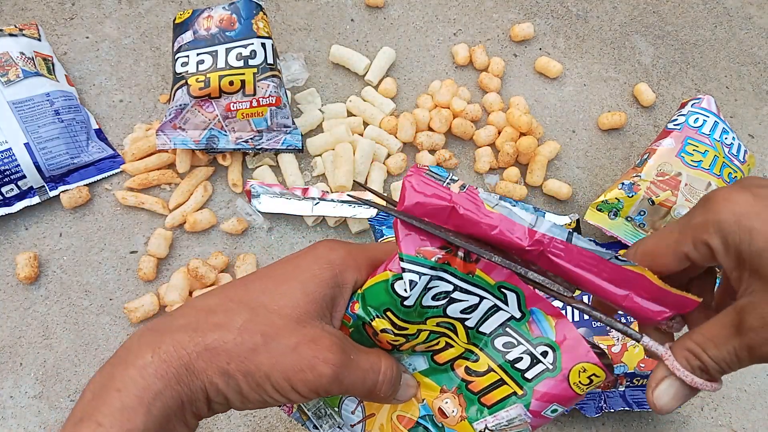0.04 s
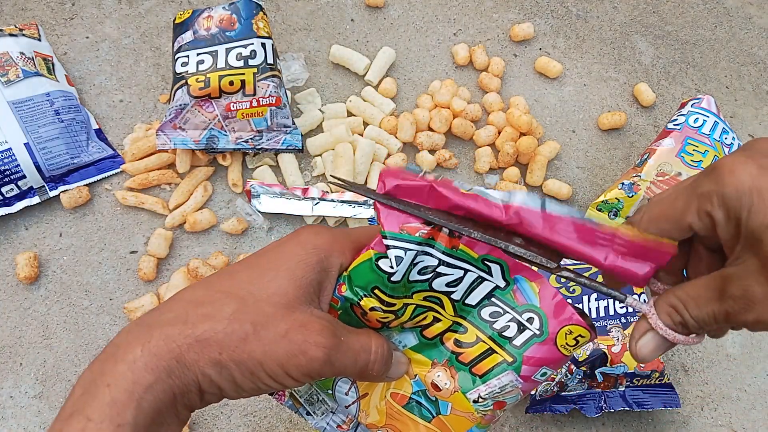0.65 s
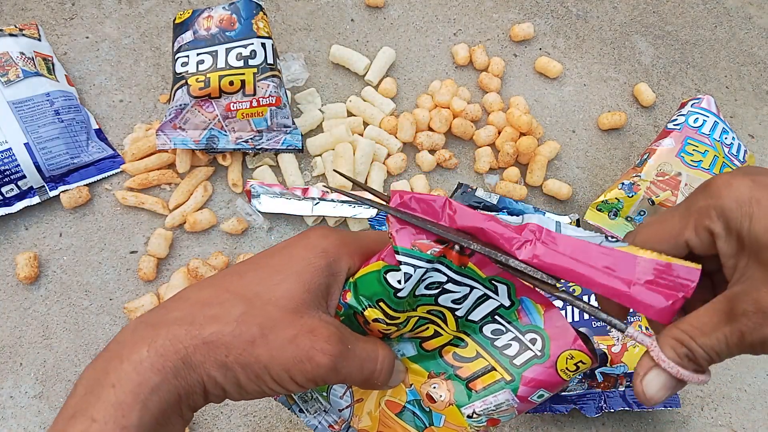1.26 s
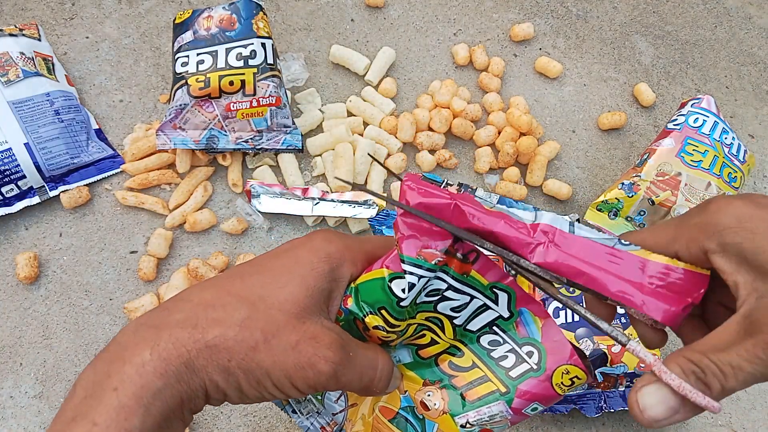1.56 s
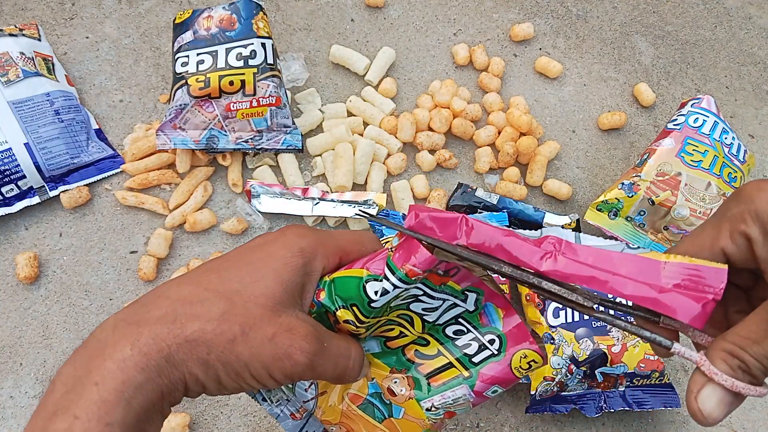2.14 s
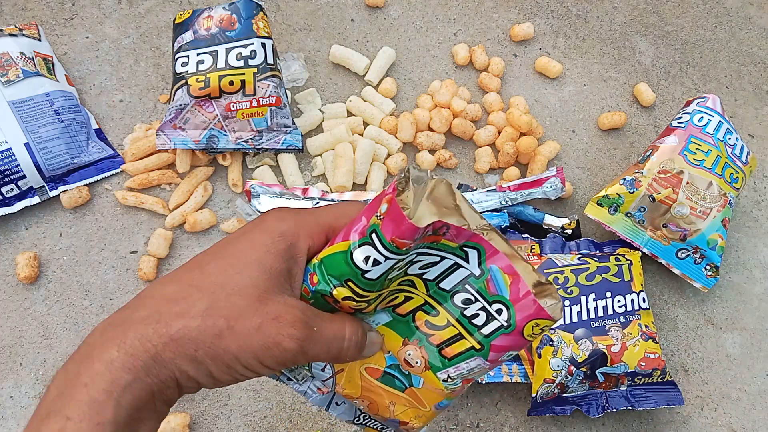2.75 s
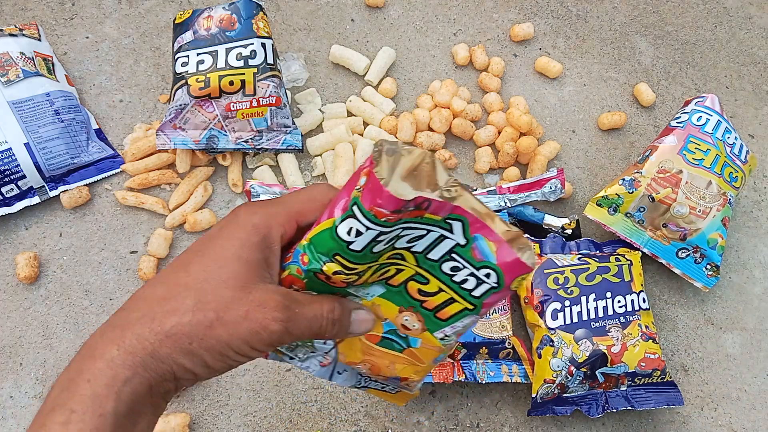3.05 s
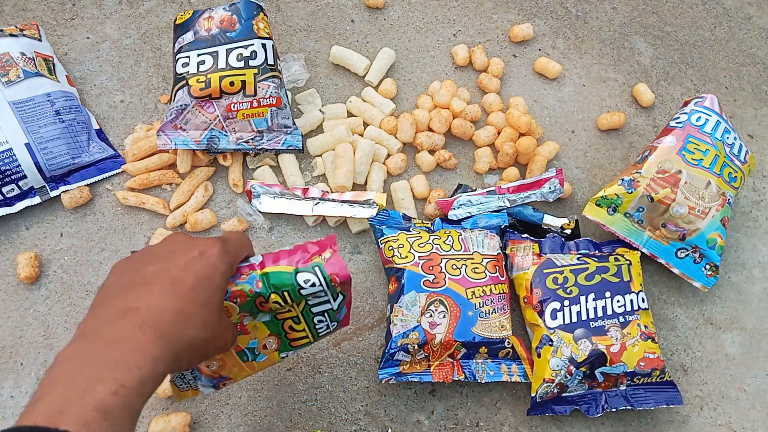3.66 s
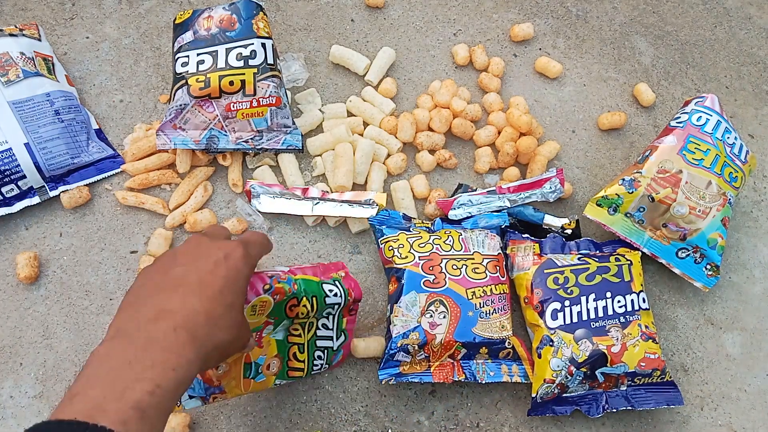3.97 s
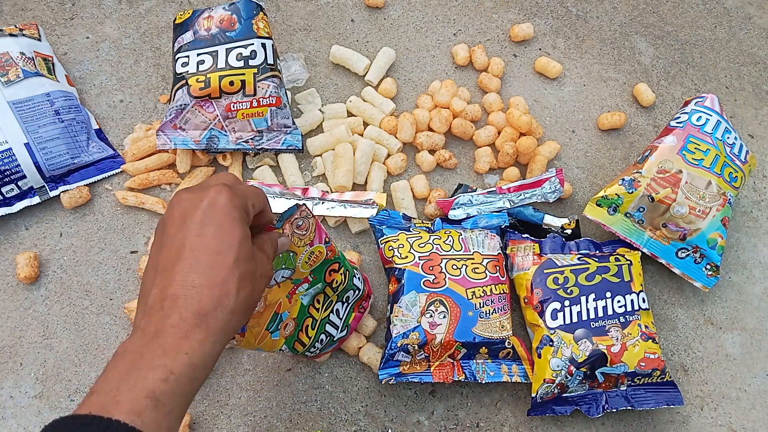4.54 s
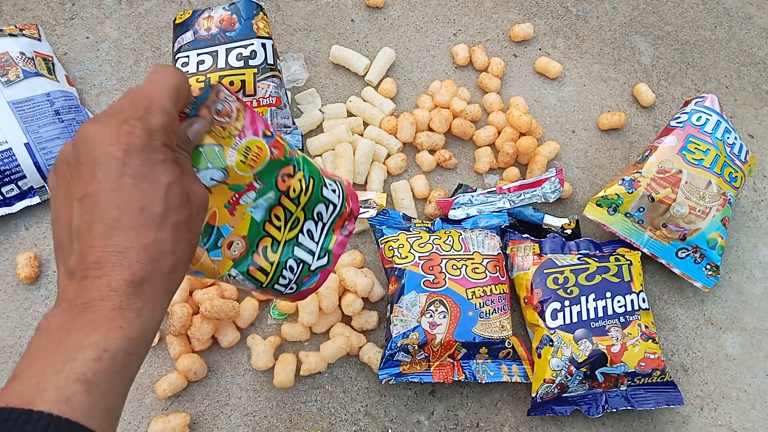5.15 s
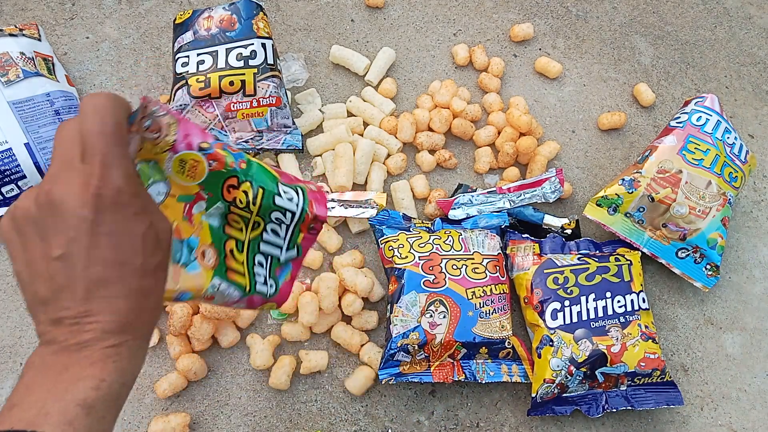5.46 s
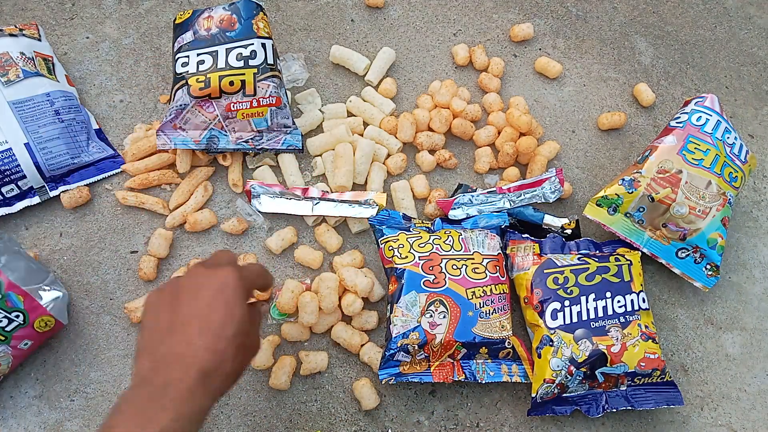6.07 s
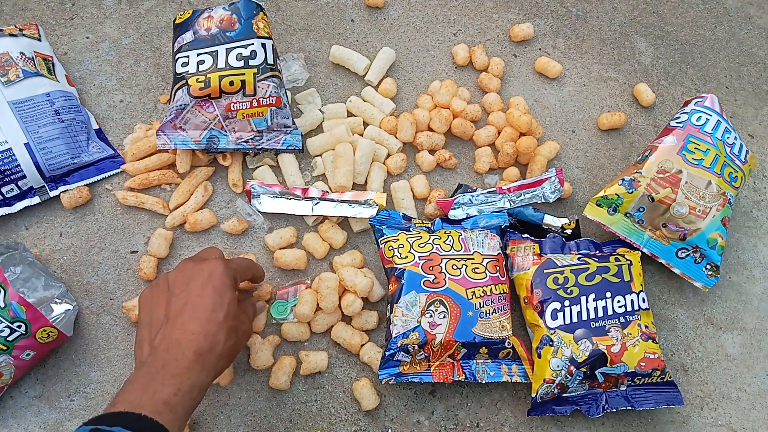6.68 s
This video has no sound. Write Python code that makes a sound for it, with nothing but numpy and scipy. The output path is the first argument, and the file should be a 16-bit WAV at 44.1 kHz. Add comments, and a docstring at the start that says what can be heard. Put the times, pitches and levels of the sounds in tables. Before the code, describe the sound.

Close, sharp crinkling of a snack packet being snipped open and emptied, with puffs lightly tapping the ground outdoors.

```python
"""Close up and outdoors, over a faint rumble, scissors open a foil snack packet and it is emptied.
First the film snaps in the hand, a blade pings faintly, and short bites crumple their way through.
Near 3 s the packet lifts with a swish and crinkles as it tips; corn puffs slide out onto concrete.
From about 5 s it is shaken empty, the film buckling in sharp snaps and dense crumples.
Last, a palm spreads the heap with a soft scrape and the rumble eases off."""
import sys
import numpy as np
from scipy import signal
from scipy.io import wavfile
from scipy.ndimage import uniform_filter1d

SR = 44100
rng = np.random.default_rng(int(sys.argv[2]) if len(sys.argv) > 2 else 0)


def generate_wav(signal):
    """Clip the signal to [-1, 1] and save it as 16-bit WAV at the path in sys.argv[1]."""
    frames = np.transpose(np.atleast_2d(signal))
    scaled = np.clip(frames, -1, 1) * 32767
    pcm = np.round(scaled).astype(np.int16)
    wavfile.write(sys.argv[1], SR, pcm)


N = 300538

# scissor bites, squeezes and shakes: (start [s], end [s], crack level [dB], bag thump level [dB])
CRUMPLES = [(0.722, 0.777, -42, -64), (0.934, 1.013, -36, -48.5), (1.208, 1.305, -44, -58.5),
            (1.37, 1.372, -55, -48.5), (1.566, 1.652, -43.5, -45.5), (1.904, 2.066, -39.5, -58),
            (2.084, 2.134, -51, -43.5), (2.364, 2.395, -39, -37.5), (2.652, 2.684, -40.5, -56),
            (2.74, 2.783, -46.5, -56.5), (4.772, 4.802, -37.5, -41.5), (5.079, 5.109, -45, -61),
            (5.314, 5.4, -45.5, -49), (5.427, 5.615, -35, -46), (5.614, 5.726, -37.5, -49.5),
            (5.818, 5.905, -39, -57.5), (5.955, 5.986, -51.5, -57)]
# tone of snapping film: (frequency [Hz], gain [dB])
SNAP_EQ = [(60, -25), (120, -6.5), (290, -2), (490, -3), (780, -1), (1300, 1), (2300, 0.5), (4100, 0),
           (5200, -5.5), (7400, -16), (9700, -8), (11900, -18.5), (15500, -19.5)]
# tone of softly rubbed film: (frequency [Hz], gain [dB])
RUB_EQ = [(60, -32), (130, 3), (340, -1.5), (520, -4.5), (950, -2.5), (1300, -4), (2500, -1.5), (4100, -3),
          (5200, -10.5), (7400, -19.5), (9700, -11), (12400, -23.5), (15500, -25)]
# registers of the packet: (low [Hz], high [Hz])
THUMP, BODY, CRACK, FIZZ = (100, 400), (400, 1500), (1500, 6000), (6000, 18000)
LEAD_SAMPLES, ATTACK_SAMPLES = 100, 200  # a click's run-up to its step, and its attack


def amp(db):
    """Decibels to gain."""
    return 10 ** (np.asarray(db) / 20)


def rms(x):
    """Root mean square."""
    return np.sqrt(np.mean(x ** 2) + 1e-20)


def add(mix, start_s, sound):
    """Mixes a sound in at a time."""
    part = mix[max(round(start_s * SR), 0):][:len(sound)]
    part += sound[:len(part)]


def colour(x, eq, size=4096):
    """Minimum-phase EQ, so attacks stay sharp."""
    hz, db = np.transpose(eq)
    bin_hz = abs(np.fft.fftfreq(size, 1 / SR)) + 1
    log_gain = np.log(amp(np.interp(np.log(bin_hz), np.log(hz), db)))
    taps = np.fft.ifft(np.exp(np.conj(signal.hilbert(log_gain)))).real[:size // 2]
    return signal.oaconvolve(x, taps.reshape((1,) * (x.ndim - 1) + (-1,)), axes=-1)[..., :x.shape[-1]]


def band(x, edges):
    """One register of a sound, with no phase shift."""
    return signal.sosfiltfilt(signal.butter(2, edges, "band", fs=SR, output="sos"), x, padtype=None)


def steadied(x, size=4400):
    """Evens out the slow level and leaves the grain."""
    return x / np.sqrt(abs(uniform_filter1d(x ** 2, size)) + 1e-12)


def placed(times, levels, shapes):
    """Puts each click at its time, with its attack at its level."""
    out = np.zeros(N)
    for when, db, shape in zip(times, levels, shapes):
        attack = shape[LEAD_SAMPLES:][:ATTACK_SAMPLES]
        add(out, when - LEAD_SAMPLES / SR, amp(db) * shape / rms(attack))
    return out


def clicks(ring_hz, ring, ring_s, flutter, decay_s, yield_s=0.0004, size=1300):
    """One click per pitch: the surface starts to yield, steps suddenly, then rings and flutters."""
    t = (np.arange(size) - LEAD_SAMPLES) / SR
    noise = rng.standard_normal((len(ring_hz), size))
    mode = np.sin(2 * np.pi * ring_hz[:, None] * t) * np.exp(-abs(t) / ring_s) * (t > 0)
    shiver = noise * np.exp(-abs(t) / np.where(t < 0, yield_s, decay_s))
    mode, shiver = (v / np.linalg.norm(v, axis=1, keepdims=True) for v in (mode, shiver))
    polarity = np.sign(noise[:, -1:])
    return ((t == 0) + ring * mode + flutter * shiver) * polarity


def crackle(per_s, spread_db, low_hz, high_hz, decay_s, fizz_spread_db=5, count=28):
    """Small facets give way at random, a few much louder than the rest, some dull and some bright."""
    strength = amp(spread_db * np.minimum(rng.exponential(1, N), 3))
    hits = strength * (rng.random(N) < per_s / SR)
    facet = rng.integers(0, count, N)
    ring_hz = np.geomspace(low_hz, high_hz, count)
    shapes = clicks(ring_hz, ring=0.63, ring_s=0.0036, flutter=1.92, decay_s=decay_s)
    fizz_gain = amp(fizz_spread_db * rng.uniform(0.037, 1, (count, 1)))
    shapes = shapes + (fizz_gain - 1) * band(shapes, FIZZ)
    out = sum(signal.oaconvolve(hits * (facet == k), shape)[:N] for k, shape in enumerate(shapes))
    return out / rms(out)


def outdoor_air(level_db=-61.5, lull_s=6.48, lull_db_per_s=19):
    """A faint bed of outdoor rumble that eases off at the end."""
    # tone of the air: (frequency [Hz], gain [dB])
    air_eq = [(25, -22), (85, 2.5), (140, -3), (700, -12.5), (3500, -30), (7000, -42)]
    rumble = colour(rng.standard_normal(N), air_eq)
    lull_db = lull_db_per_s * np.maximum(np.arange(N) / SR - lull_s, 0)
    return amp(level_db - lull_db) * rumble / rms(rumble)


def yard_echoes(x, ground_s=0.003, ground_db=-13, wall_s=0.0098, wall_db=-24, tail_db=-22, t60_s=0.24):
    """The ground and a wall echo each click; a weak, duller scattered tail follows."""
    t = np.arange(SR // 2) / SR
    scatter = signal.lfilter(*signal.butter(1, 5000, fs=SR), rng.standard_normal(len(t)))
    tail = scatter * np.exp(-np.log(1000) * t / t60_s) * (t > ground_s)
    echoes = amp(tail_db) * tail / np.linalg.norm(tail)
    add(echoes, ground_s, amp([ground_db]))
    add(echoes, wall_s, amp([wall_db]))
    return x + signal.oaconvolve(x, echoes)[:N]


def blade_pings(t60_s=0.29):
    """A steel blade rings faintly as the scissors shift."""
    # thin metal pings: (time [s], pitch [Hz], peak level [dB])
    pings = [(.375, 2100, -65), (.434, 2500, -64.5)]
    t = np.arange(SR // 2) / SR
    decay = np.exp(-np.log(1000) * t / t60_s)
    out = np.zeros(N)
    for when, hz, db in pings:
        add(out, when, amp(db) * decay * np.sin(2 * np.pi * hz * t))
    return out


def packet_swish(start_s=2.7, end_s=3.18, level_db=-55):
    """The lifted packet slides smoothly off its neighbours."""
    hiss = band(colour(rng.standard_normal(SR), SNAP_EQ), (BODY[0], FIZZ[1]))
    stroke = signal.windows.hann(int((end_s - start_s) * SR))
    out = np.zeros(N)
    add(out, start_s, amp(level_db) * stroke * hiss[:len(stroke)] / rms(hiss))
    return out


def heap_spreading():
    """Puffs roll and scrape softly under the palm."""
    # the stroke of the hand: (time [s], level [dB])
    stroke = [(6.1, -81), (6.22, -50), (6.33, -57), (6.47, -60.5), (6.62, -84)]
    # tone of the rubbed heap: (frequency [Hz], gain [dB])
    heap_eq = [(100, -13), (330, 4), (480, -3), (800, -10), (3000, -14), (3900, -11), (5200, -28.5),
               (15000, -34.5)]
    times, levels = np.transpose(stroke)
    rub = colour(rng.standard_normal(N), heap_eq)
    return np.interp(np.arange(N) / SR, times, amp(levels), left=0, right=0) * rub / rms(rub)


def film_motion(t, in_fizz=False, held_db=-68.5, creep_db=-9.5, settle_db_per_s=135):
    """Rustle envelope: film stirs while held, swells as the grip shifts, creeps back after a crumple."""
    # shifts of grip: (middle [s], length [s], relative level [dB], extra fizz [dB])
    grip_shifts = [(0.005, 0.12, -41.5, 3.5), (0.223, 0.23, -49.5, -2.5), (1.426, 0.09, -54, 7),
                   (1.89, 0.2, -46.5, 0.5), (2.359, 0.074, -43, -2), (2.997, 0.21, -50.5, -0.5),
                   (3.291, 0.18, -56, -6.5), (3.83, 0.53, -61, 8.5), (4.22, 0.35, -59.5, 5.5),
                   (4.624, 0.2, -48, -1), (4.864, 0.096, -49.5, -1), (5.045, 0.12, -46, -9),
                   (5.258, 0.056, -44.5, -3), (6.038, 0.14, -46, -3), (6.601, 0.091, -69.5, 16)]
    swells = sum(amp(db + in_fizz * fizz_db) * np.cos(np.pi * np.clip((t - middle) / length, -0.5, 0.5))
                 for middle, length, db, fizz_db in grip_shifts)
    creep = sum(amp(db + creep_db - settle_db_per_s * np.maximum(t - end, 0)) * (t > start)
                for start, end, db, _ in CRUMPLES)
    return np.sqrt(amp(held_db) ** 2 + swells ** 2 + creep ** 2)


def rustle_and_pour(hiss_gain=0.35, scrape_db=-7, trim_db=-2.5):
    """Fingers slide on the film and puffs tumble inside and out of it: fine clicks over a soft hiss."""
    # puffs slide down the tipped packet and pour out: (time [s], relative level [dB])
    pour_curve = [(3.1, -71), (3.55, -67), (3.72, -55), (4.05, -58.5), (4.24, -46), (4.4, -64.5),
                  (5.15, -63.5), (5.6, -62), (6.08, -45), (6.3, -84)]
    # puffs stir more freely once the packet is lifted: (time [s], level against the rustle [dB])
    stir_curve = [(2.4, -5), (3.3, -3)]
    t = np.arange(N) / SR
    pour_s, pour_db = np.transpose(pour_curve)
    pouring = amp(np.interp(t, pour_s, pour_db)) * (t > pour_s[0]) * (t < pour_s[-1])
    motion = film_motion(t)
    stirring = motion * amp(np.interp(t, *np.transpose(stir_curve)))
    grains = crackle(per_s=190, spread_db=6, low_hz=900, high_hz=4340, decay_s=0.0017)
    rub = colour(grains + hiss_gain * rng.standard_normal(N), RUB_EQ)
    film = steadied(band(rub, (CRACK[0], FIZZ[1])))
    rustle = motion * film + (film_motion(t, in_fizz=True) - motion) * band(film, FIZZ)
    tumble = np.hypot(stirring, pouring) * steadied(band(rub, (THUMP[0], BODY[1])))
    scrape = amp(scrape_db) * pouring * steadied(band(rub, CRACK))
    return amp(trim_db) * (rustle + tumble + scrape)


def dry_ticks():
    """Light dry ticks: the tipped packet crinkles, then puffs tap the concrete."""
    # crinkles before 4 s, puffs landing after: (time [s], level [dB], ring [Hz])
    ticks = [(3.7436, -41, 1800), (3.7608, -42, 2770), (3.815, -46.0, 4400), (3.864, -47, 1180),
             (3.9393, -43, 4530), (4.1074, -44, 3440), (4.1812, -40, 2650), (4.2605, -39, 805),
             (6.2334, -40, 1970)]
    times, levels, ring_hz = np.transpose(ticks)
    shapes = clicks(ring_hz, ring=1.0, ring_s=0.0027, flutter=2.8, decay_s=0.0029)
    return placed(times, levels, colour(shapes, RUB_EQ))


def film_crumples(film_lag_s=0.0023, bag_lag_s=0.0073, bag_share=0.26, tail_samples=2000):
    """Runs of tiny buckles as the film is cut or crushed; the air in the bag thumps more slowly."""
    buckles = crackle(per_s=520, spread_db=5.0, low_hz=808, high_hz=4876, decay_s=0.0011)
    film = colour(buckles, SNAP_EQ)
    starts, ends, crack_db, thump_db = np.transpose(CRUMPLES)
    body_db = crack_db - 4 + bag_share * (thump_db - crack_db)
    fizz_db = crack_db - 6.5
    out = np.zeros(N)
    for edges, lag_s, levels in ((CRACK, film_lag_s, crack_db), (BODY, film_lag_s, body_db),
                                 (FIZZ, film_lag_s, fizz_db), (THUMP, bag_lag_s, thump_db)):
        register = band(film, edges)
        for start, end, db in zip(starts, ends, levels):
            length = round((end - start) * SR)
            t = np.arange(length + tail_samples) / SR
            release = np.exp(-np.maximum(t - length / SR, 0) / (2 * lag_s))
            press = (1 - np.exp(-t / lag_s)) * release
            run = register[round(start * SR):][:len(t)] * press
            add(out, start, amp(db) * run * rms(press) / rms(run))
    return out


def film_snaps(mid_flap_hz=3000, mid_body_db=-13.5, body_db_per_octave=7):
    """Single creased flaps snap through; a bigger flap rings lower and has more body."""
    # flaps flipping: (time [s], crack level [dB], ring [Hz], fizz against the crack [dB])
    flaps = [(0.017, -30, 3460, -10.5), (0.0606, -35.5, 1590, -26), (0.0954, -38.5, 704, -13),
             (0.2712, -31.5, 4130, -6), (0.5298, -40.5, 1960, 2), (0.5756, -47.5, 4130, 0),
             (0.592, -37.5, 2020, -8.5), (0.676, -44, 4300, -1), (0.735, -38.5, 832, -4),
             (0.7479, -35.5, 1570, 0), (0.7555, -29.5, 3940, -0.5), (0.9214, -42, 3950, -2),
             (0.9558, -32.5, 2400, -10), (0.991, -35, 2520, -22), (1.0237, -35, 2600, -7),
             (1.051, -39, 2570, -20), (1.2162, -36.5, 2550, -16), (1.229, -30, 5500, -2),
             (1.2373, -27.5, 5430, -6.5), (1.2894, -35, 4130, -0.5), (1.3303, -39, 4400, -10.5),
             (1.354, -40, 2570, -11), (1.3788, -23, 4060, -7), (1.383, -25.5, 3300, -7),
             (1.441, -36, 3960, -3), (1.5777, -30.5, 1240, -9), (1.6307, -31.5, 4210, -8.5),
             (1.6587, -32.5, 3500, -7.5), (1.819, -36, 4080, -11.5), (1.923, -29, 4140, -12),
             (2.0149, -28.5, 970, 2.5), (2.049, -28, 1420, -7), (2.0583, -28.5, 2650, -3.5),
             (2.091, -34.5, 744, -9), (2.1271, -26.5, 4100, -7.5), (2.1824, -41, 1260, -16),
             (2.3689, -27, 4120, -2.5), (2.3771, -26, 2100, -4.5), (2.5027, -51, 3940, 7.5),
             (2.6592, -38, 900, -11), (2.764, -36.5, 3380, -26), (2.9948, -31.5, 2420, -7.5),
             (3.095, -46, 2460, -14), (3.1275, -42.5, 2970, -8), (3.1488, -44, 3230, -23),
             (3.4112, -47.5, 2270, -9), (3.621, -40.5, 1510, -9.5), (4.5625, -35.5, 3560, -10.5),
             (4.6935, -37.5, 3580, -9), (4.7792, -30, 3630, -9), (4.9483, -38.5, 3720, -13),
             (5.0293, -34.5, 1390, -8), (5.1, -31, 3300, -4.5), (5.192, -28, 3580, -9.5),
             (5.225, -29, 3090, -11.5), (5.2967, -35.5, 1590, -14), (5.336, -29, 2280, -9),
             (5.3932, -25.5, 2280, -8.5), (5.4455, -21, 3370, -4.5), (5.533, -31, 3620, 2),
             (5.549, -24, 2450, -9), (5.591, -33.5, 2980, 1), (5.7108, -29, 4220, -2),
             (5.8016, -38, 1750, -2.5), (5.857, -30, 1720, -9.5), (6.011, -31, 2560, -20),
             (6.0536, -36, 1750, -7.5)]
    times, crack_db, ring_hz, fizz_db = np.transpose(flaps)
    body_db = mid_body_db + body_db_per_octave * np.log2(mid_flap_hz / ring_hz)
    snaps = colour(clicks(ring_hz, ring=1.0, ring_s=0.0021, flutter=3.65, decay_s=0.002), SNAP_EQ)
    return sum(placed(times, crack_db + db, band(snaps, edges))
               for edges, db in ((CRACK, 0), (BODY, body_db), (FIZZ, fizz_db)))


def scene():
    """The packet and the puffs in the open air, in mono."""
    foreground = film_snaps() + film_crumples() + dry_ticks() + rustle_and_pour()
    soft_touches = packet_swish() + heap_spreading() + blade_pings()
    return (yard_echoes(foreground + soft_touches) + outdoor_air())[None]


def record(dry):
    """A steep low-pass trims the very top of the fizz."""
    low_pass = signal.firwin(255, 15850, window=("kaiser", 8), fs=SR)
    return signal.oaconvolve(dry, low_pass[None], "same")


dry = scene()
out = record(dry)
generate_wav(out)
```